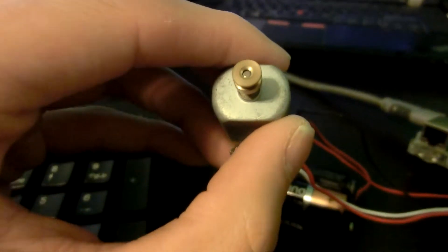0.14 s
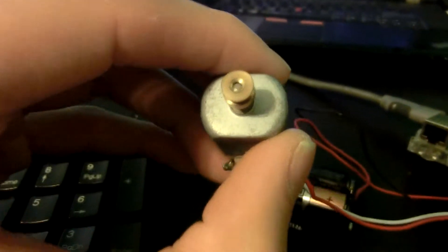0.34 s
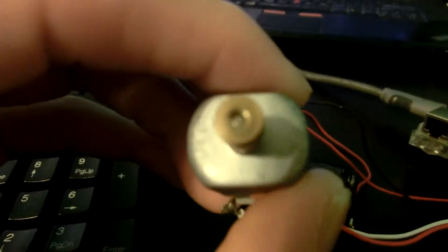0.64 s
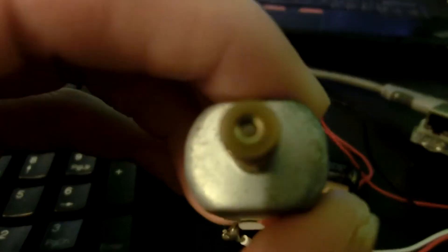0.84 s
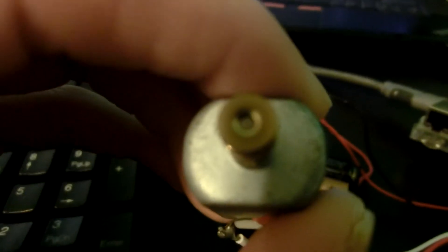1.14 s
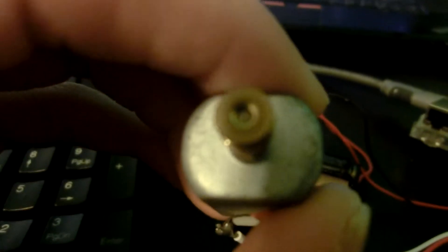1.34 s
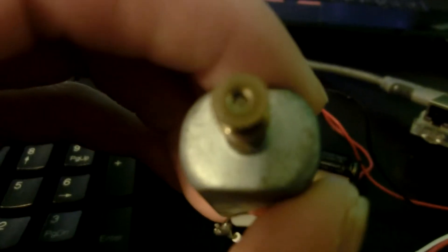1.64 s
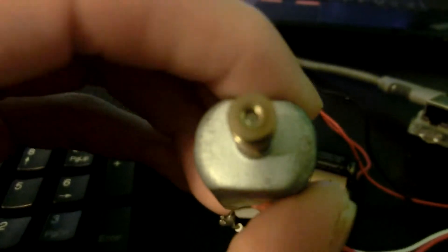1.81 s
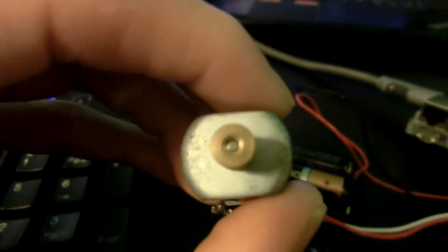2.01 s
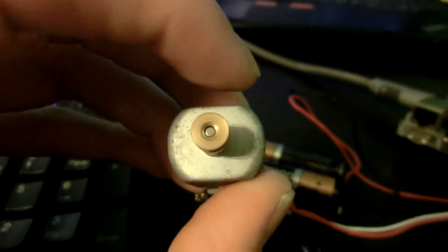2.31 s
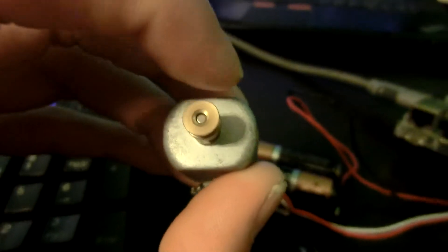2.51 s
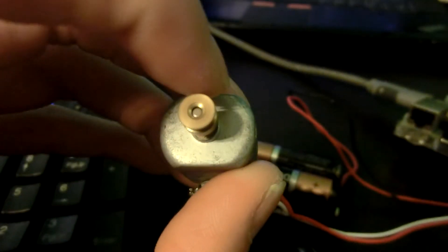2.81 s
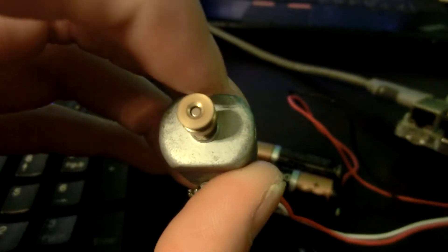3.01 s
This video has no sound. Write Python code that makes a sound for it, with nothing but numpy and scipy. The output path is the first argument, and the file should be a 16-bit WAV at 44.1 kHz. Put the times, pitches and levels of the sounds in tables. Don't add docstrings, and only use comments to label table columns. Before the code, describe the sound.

A small brushed electric motor whines thin and high under sharp hiss, slowly rising in pitch.

```python
import sys
import numpy as np
from scipy import signal
from scipy.fft import rfft, irfft, next_fast_len
from scipy.io import wavfile
from scipy.ndimage import uniform_filter1d, map_coordinates

SR = 44100
rng = np.random.default_rng(int(sys.argv[2]) if len(sys.argv) > 2 else 0)


def volts_from_decibels(level):
    exponent = np.asarray(level, float) / 20
    return 10 ** exponent


def persist_wave(psi):
    counts = np.round(np.clip(psi, -1, 1) * 32767).astype(np.int16)
    wavfile.write(sys.argv[1], SR, np.atleast_2d(counts).T)


N = 138915
SLOW_S = np.arange(0, N + 64, 64) / SR


def evened(x):
    return x / np.sqrt(np.mean(np.abs(x) ** 2) + 1e-20)


def read(points, hz):
    f, value = np.transpose(points)
    return np.interp(np.log(hz + 1), np.log(f + 1), value)


def control(table, axis):
    rows = np.array(table)
    return uniform_filter1d(np.interp(SLOW_S, rows[:, 0], rows[:, axis]), size=41, mode="nearest")


def wander(hz):
    return map_coordinates(rng.standard_normal(400), [SLOW_S * 2 * hz], order=3)


def full(slow):
    return np.interp(np.arange(N) / SR, SLOW_S, slow)


# freq_hz, left_lead_rad
PORT_PHASE = [(0, 0), (10200, 0.53), (11000, -0.41), (12000, 1.7), (13600, 0.57), (14400, 1.5),
              (15000, 1.1), (15500, 1)]
# freq_hz, level_db
RIGHT_LEVEL = [(300, -4.5), (2000, 1.5), (5000, -8.5), (9000, -7), (13000, -10.5)]


def tone(order, db, turns, speed):
    hz = order * speed
    phase = 2 * np.pi * (order * turns + rng.random())
    lag_rad = read(PORT_PHASE, hz) + 0.12 * wander(hz=2.512)
    left = volts_from_decibels(db) * np.sqrt(2)
    right = left * volts_from_decibels(read(RIGHT_LEVEL, hz) + 2.0 * wander(hz=3.51))
    return np.array([full(left) * np.cos(phase), full(right) * np.cos(phase - full(lag_rad))])


# start_s, nearness_db, can_ring_db, brush_pressure_db, comb_db
HAND = [(0, -13, 0, -4.5, 3.5), (.15, -7, 8, -7, 3.5), (.5, 0.5, 3, -0.5, 5), (.68, 5.5, 8, -1, 0.5),
        (.8, 6, 8.5, 0.7, 1.7), (1.1, 8.5, 5, 0.5, 2.5), (1.3, 5, 8.5, 2.5, 0), (1.6, 7, -1, 3.5, 4),
        (1.85, 0.5, -11, 3, 3.5), (1.98, 2, 3, 4.5, -2), (2.06, 5, 14.5, 0, -1), (2.2, -2.5, 8.5, 1.5, -2),
        (2.45, -2.5, 7.5, -3, -1.5), (2.6, -4, -7, -2, -4), (2.82, -4, -22, -1.5, -5),
        (2.97, -1, 0, 1.5, -4), (3.15, -4, -6, 1, -1)]
# shaft_order, level_db, nearness_share, drift_db_per_s
POLES = [(1, -68, 0.68, 1.1), (3, -69, 0.83, 3.3), (5, -76, 0.79, -7.5), (6, -65, 0.29, 4),
         (9, -58.5, 0.93, -1.1), (12, -60.5, 0.32, 2.5), (15, -64.5, .1, 3), (18, -60.5, 0.35, 1.5),
         (21, -62.5, 0.27, 1.5), (24, -65, 0.28, 0), (27, -59, 0.56, 4.5), (30, -59.5, 0.081, -0.5)]


def pole_whine(turns, speed):
    near_db = control(HAND, axis=1)
    mid_s = SLOW_S - N / SR / 2
    out = np.zeros((2, N))
    for order, db, share, drift in POLES:
        level_db = db + share * near_db + drift * mid_s + 1.4 * wander(hz=9.)
        out += tone(round(order), level_db, turns, speed)
    return out


# freq_hz, level_db
COMB = [(7000, -78), (8300, -65.5), (9300, -57), (10300, -49), (11300, -53), (12500, -53), (14300, -53),
        (15500, -68)]
# shaft_order, level_over_comb_db, brush_pressure_share, drift_db_per_s
SLOTS = [(33, 8.5, -0.6, 7), (36, 12, 0, -2), (39, 10, -0.84, 1.5), (42, 8, -0.1, -4.5), (45, 7, -0.6, 0.7),
         (48, 4, 0, -2), (51, 4.5, 1, -0.5), (54, 5, -1, 1.5), (57, 5, 0.5, 2), (60, 1, 5, 1),
         (63, 3, 0.5, 2), (66, -2, 7.5, 9)]


def can_whine(turns, speed):
    can_hz, can_width_hz = 10755, 300
    press_db, comb_db = control(HAND, axis=3), control(HAND, axis=4)
    ring = volts_from_decibels(1.5 + control(HAND, axis=2))
    mid_s = SLOW_S - N / SR / 2
    slots = {round(order): db + share * press_db + drift * mid_s for order, db, share, drift in SLOTS}
    out = np.zeros((2, N))
    for order in range(31, 70):
        hz = order * speed
        is_slot = order in slots
        peak = ring * volts_from_decibels(1.5 * is_slot)
        lift = 1 + peak / (1 + (2 * (hz - can_hz) / can_width_hz) ** 2)
        waver_db = (2.5 if is_slot else 4.5) * wander(hz=5.5) / np.sqrt(lift)
        level_db = read(COMB, hz) + slots.get(order, 0) + comb_db + waver_db + 20 * np.log10(lift)
        out += tone(order, level_db, turns, speed)
    return out


def noise(colour, same, pan_db, turn):
    size = next_fast_len(N)
    hz = np.fft.rfftfreq(size, 1 / SR)
    a, b = rfft(rng.standard_normal((2, size)))
    c = np.clip(read(same, hz), -1, 1)
    shared = c * a * np.exp(-1j * turn * read(PORT_PHASE, hz))
    right = (shared + np.sqrt(1 - c ** 2) * b) * volts_from_decibels(pan_db(hz))
    out = irfft(np.array([a, right]) * volts_from_decibels(read(colour, hz)), size)[:, :N]
    return out / np.sqrt(np.mean(out[0] ** 2))


# freq_hz, density_db_per_hz
HISS = [(6500, -31), (8300, -20.5), (9400, -11.5), (10800, -5), (12000, -2.5), (13200, -0.7), (14700, -3.5),
        (15600, -13.5)]
# freq_hz, left_right_likeness
HISS_SAME = [(6000, 0.51), (9000, 0.67), (12000, 0.53), (15000, 0.52)]


def brushes(turns):
    gate_depth, decay_turns, spark_db = 0.69, 0.18, 1
    slot = (3 * turns).astype(int)
    slot_db = np.array([0, -5.5, -4.5])[slot % 3]
    size = volts_from_decibels(spark_db * rng.standard_normal(4000)[slot] + slot_db)
    burst = np.exp(-(turns * 3 % 1) / (3 * decay_turns))
    gate = 1 - gate_depth + gate_depth * 2.4 * size * burst
    hiss = noise(HISS, HISS_SAME, lambda hz: read(RIGHT_LEVEL, hz), 1)
    level_db = -29.5 + control(HAND, axis=3) + 0.76 * wander(hz=9.)
    return full(volts_from_decibels(level_db)) * evened(gate) * hiss


# freq_hz, width_hz, level_db
FAN = [(55.4, 1.7, -53), (111, 9.9, -63.5), (123.3, 5.5, -67), (134.4, 5.3, -64), (216, 8.004, -71)]


def fan():
    pan = volts_from_decibels(np.array([[.8], [-.8]]))
    out = np.zeros((2, N))
    for hz, width_hz, db in FAN:
        turn = np.cumsum(full(hz + width_hz * wander(hz=14.))) / SR
        level = full(volts_from_decibels(db + 0.77 * wander(hz=9.)))
        out += level * pan * np.sqrt(2) * np.cos(2 * np.pi * (turn + rng.random()))
    return out


# freq_hz, density_db_per_hz
AIR = [(12, -67), (20, -13), (60, -10), (176, -15), (359, -18), (2040, -17), (4510, -19.5), (7530, -18.5),
       (9000, -24.5), (11700, -48), (19800, -120)]
# freq_hz, left_right_likeness
AIR_SAME = [(60, 0.79), (130, 0.39), (300, 0.3), (1000, 0.13), (2500, 0.38), (6000, 0.12)]
# freq_hz, left_minus_right_db
AIR_PAN = [(60, 7), (240, 0.5), (950, 9), (3770, 8), (15000, 23)]


def room():
    return volts_from_decibels(-47) * noise(AIR, AIR_SAME, lambda hz: -read(AIR_PAN, hz), 0)


# start_s, shaft_turns_per_s
SPEED = [(0, 216.2), (.055, 217.3), (.11, 219.1), (.3, 222.1), (.6, 227.4), (.95, 231.7), (1.25, 238.3),
         (1.5, 243.9), (1.75, 247.3), (1.88, 248.5), (1.97, 246.9), (2.12, 239.2), (2.2, 236.9),
         (2.32, 237.9), (2.62, 243.4), (2.78, 248.9), (3.0, 255.5), (3.15, 259.6)]


def scene():
    speed = control(SPEED, axis=1) * (1 + .0006 * wander(hz=29.91))
    turns = np.cumsum(full(speed)) / SR
    motor = pole_whine(turns, speed) + can_whine(turns, speed) + brushes(turns)
    return motor + fan() + room()


def low_pass(x):
    return signal.sosfilt(signal.butter(12, 15730, fs=SR, output="sos"), x)


# freq_hz, width_hz
NOTCHES = [(12500, 72), (15270, 200)]


def record(dry):
    for hz, width_hz in NOTCHES:
        dry = signal.lfilter(*signal.iirnotch(hz, hz / width_hz, SR), dry)
    lowpass = signal.firwin(801, 15690, window=("kaiser", 9), fs=SR)
    mix = signal.oaconvolve(dry, lowpass[None], "same")
    return low_pass(mix)


dry = scene()
out = record(dry)
persist_wave(out)
```